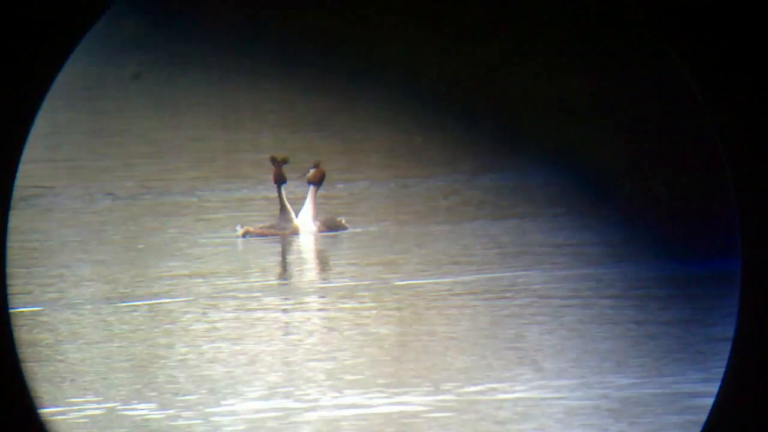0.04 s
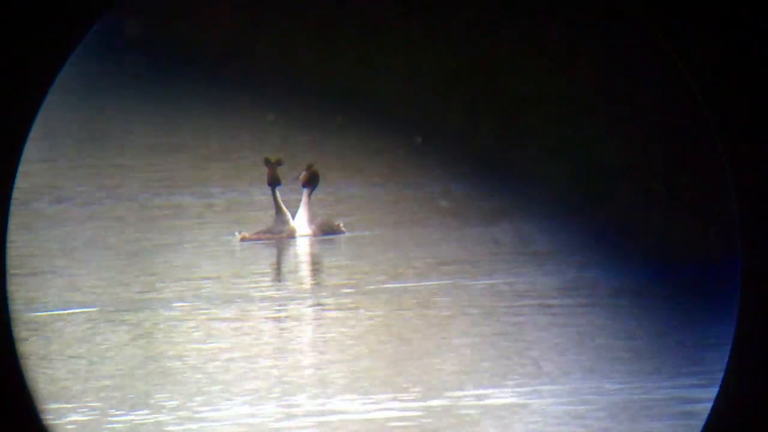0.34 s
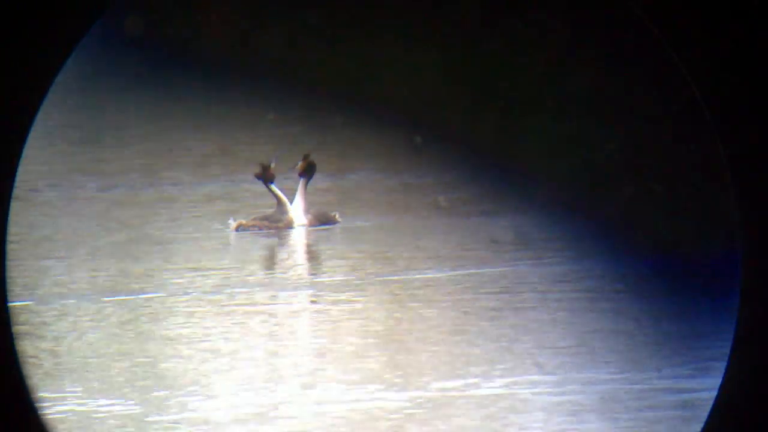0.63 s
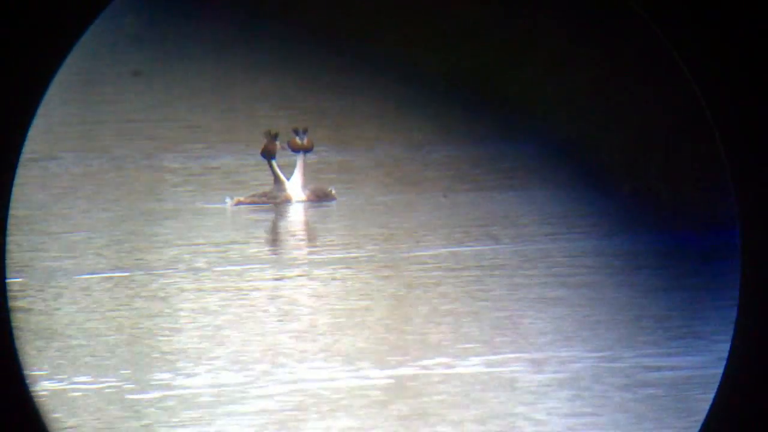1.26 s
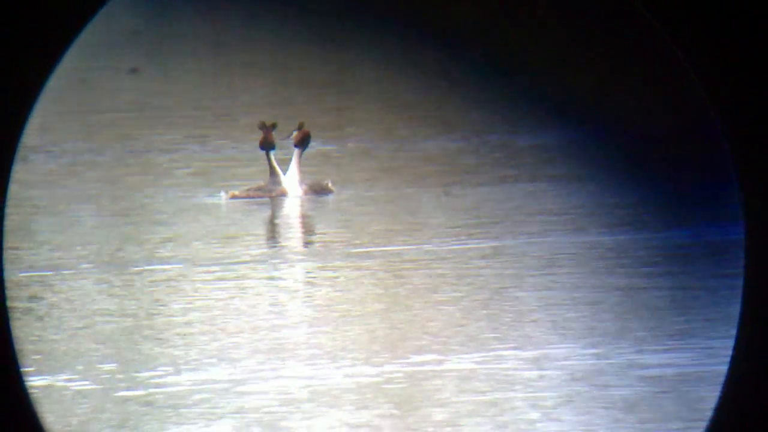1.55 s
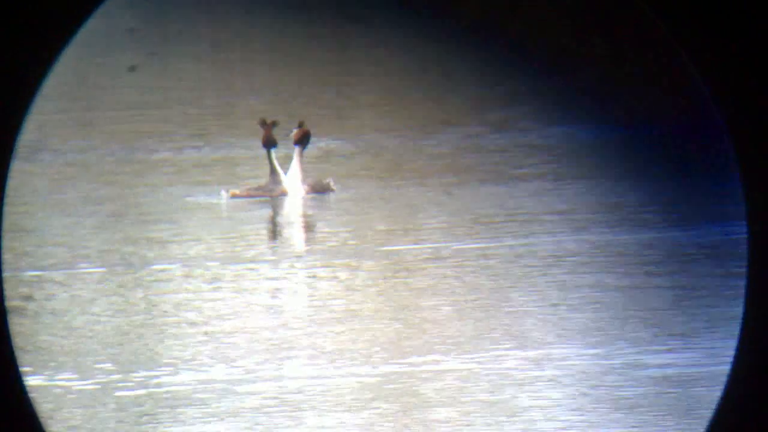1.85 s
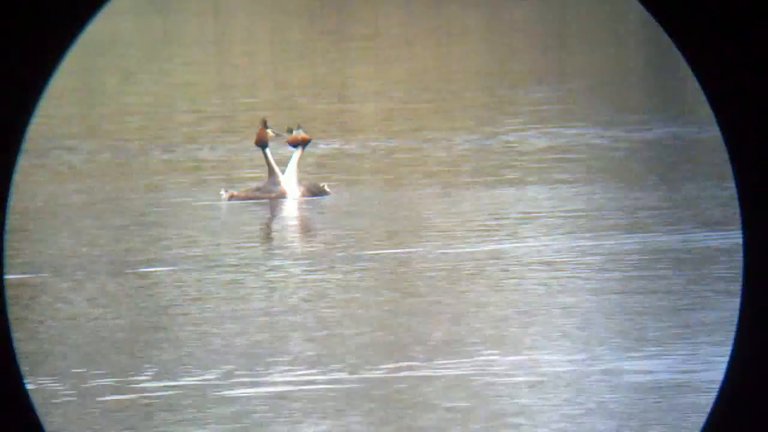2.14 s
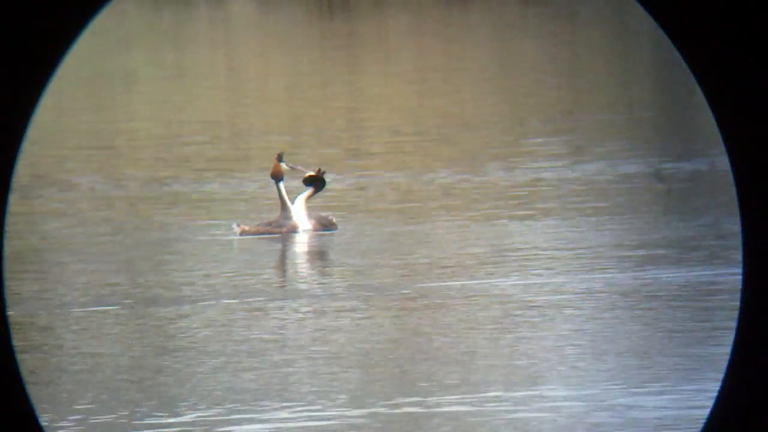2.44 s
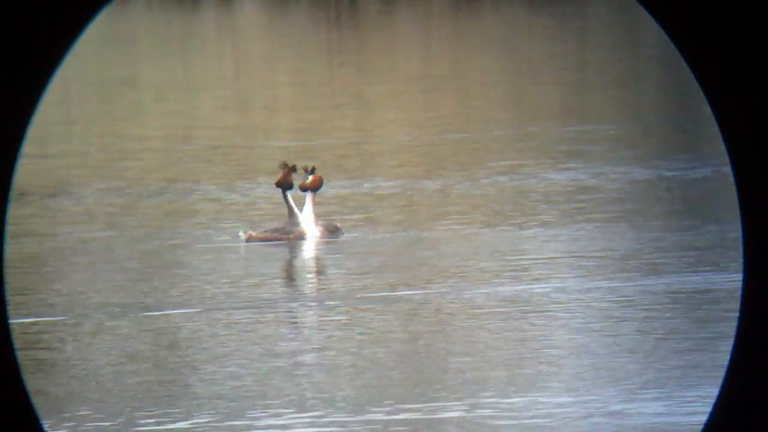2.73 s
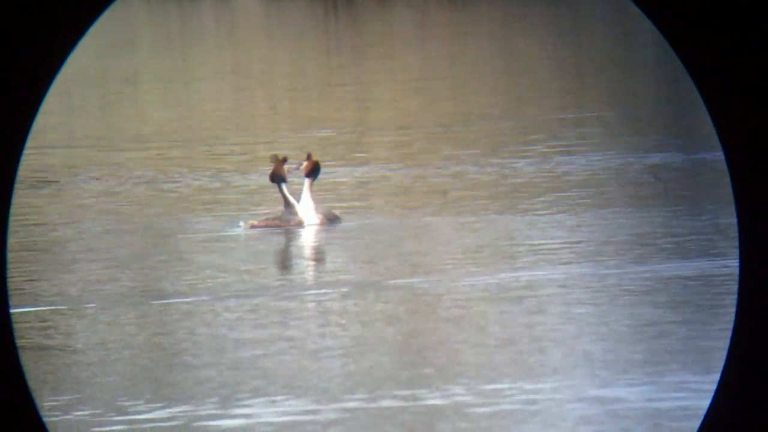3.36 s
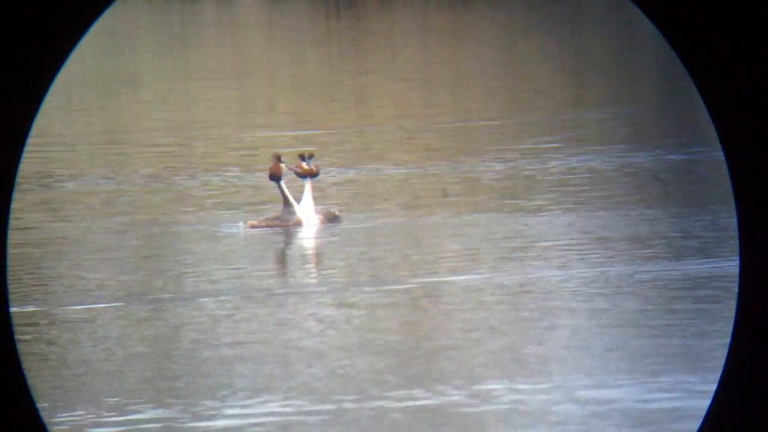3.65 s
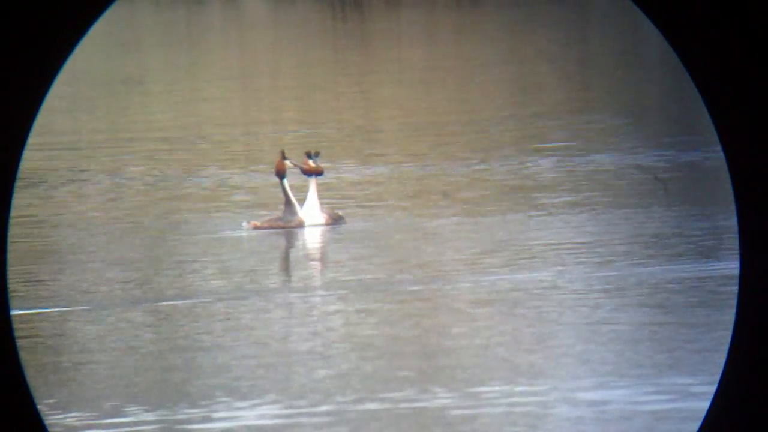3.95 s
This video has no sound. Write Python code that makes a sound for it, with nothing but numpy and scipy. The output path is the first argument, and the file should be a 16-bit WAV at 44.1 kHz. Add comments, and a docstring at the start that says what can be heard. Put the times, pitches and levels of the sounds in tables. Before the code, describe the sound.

Soft gusts of wind buffet the microphone, with light camera clicks and faint distant traffic.

```python
"""Gusts of light wind rumble on the microphone, and single eddies pop across its port.
This is a lakeside, heard from a small camera held against a spotting scope. The camera ticks on
the eyepiece, then slips with hard clicks, a scrape and a short stick-slip chatter.
Behind it hum the tyres of distant traffic, and far birds chirp faintly over a thin hiss."""
import sys
import numpy as np
from scipy import signal
from scipy.fft import rfft, irfft, next_fast_len
from scipy.io import wavfile
from scipy.ndimage import map_coordinates

SR = 44100
rng = np.random.default_rng(int(sys.argv[2]) if len(sys.argv) > 2 else 0)


def log_audio(samples):
    """Write samples as a 16-bit WAV file to the path given in sys.argv[1]."""
    # one column per channel
    frames = np.atleast_2d(samples).T
    # limit to full scale, then quantise
    limited = np.clip(frames, -1, 1)
    pcm = np.round(limited * 32767).astype(np.int16)
    wavfile.write(sys.argv[1], SR, pcm)


N = 176400
START_S = .093  # the camera's input opens

# gust envelope: t/s, level/dB
GUSTS = [(.1, -58), (.2, -54), (.24, -46), (.275, -58.5), (.325, -43), (.42, -56), (.75, -60.5),
         (.81, -54.5), (.86, -60.5), (1.055, -59.5), (1.09, -48.5), (1.15, -57), (1.26, -44), (1.37, -40),
         (1.455, -45), (1.5, -40.5), (1.6, -49), (1.69, -63), (1.9, -58.5), (2.11, -56.5), (2.19, -52),
         (2.33, -54.5), (2.43, -61), (2.62, -52), (2.8, -48), (2.855, -55.5), (2.9, -50), (3.1, -49.5),
         (3.15, -57.5), (3.19, -44.5), (3.26, -65.5), (3.37, -57.5), (3.445, -45), (3.49, -58),
         (3.6, -56.5), (3.67, -62), (3.88, -65.5), (4.0, -53.5)]
# colour of the gust rumble: f/Hz, relative level/dB
RUMBLE_COLOUR = [(15, -34), (28, -21.5), (45, -11.5), (70, -3.5), (110, -0.5), (170, -1), (250, -3),
                 (350, -10.5), (500, -21.5), (700, -25.5), (1200, -51.5), (3000, -98)]
# colour of the low bed under it: f/Hz, relative level/dB
BED_COLOUR = [(12, -17.5), (25, -8), (45, -2), (70, 2.5), (105, -1), (150, -0.5), (210, -13.5),
              (320, -31.5), (800, -56.5)]


def wind(flutter_db=2.83, flutter_per_s=65, bed_db=-54, bed_follow=0.36):
    """Turbulence on the microphone: a gusting rumble over a steadier low bed, fluttering together."""
    gust_db = curve(GUSTS)
    flutter = amp(flutter_db * wobble(flutter_per_s))
    rumble = amp(gust_db) * unit(noise(RUMBLE_COLOUR) * flutter)
    swing_db = gust_db - gust_db.mean()
    bed = amp(bed_db + bed_follow * swing_db) * unit(noise(BED_COLOUR) * flutter)
    return rumble + bed


# eddies popping across the port: t/s, peak level/dB, half width/s
EDDY_POPS = [(0.1207, -35.5, 0.001), (0.2343, -45, 0.0025), (.2524, -29, .0006), (.3214, -35, 0.0013),
             (.3679, -39, 0.00095), (0.4896, -38.5, 0.00041), (.819, -32, 0.00053),
             (1.3112, -34.5, 0.00049), (1.3592, -32.5, 0.00067), (1.3712, -30, 0.00063),
             (1.4854, -28, 0.00062), (1.4987, -32, 0.00049), (2.1881, -33.5, 0.00087),
             (2.1972, -35, 0.00071), (2.2619, -33.5, 0.00055), (2.3747, -37, 0.00071),
             (2.472, -41, 0.00057), (2.6265, -43, 0.00087), (2.736, -36, 0.0017), (2.7503, -41, 0.00049),
             (2.8073, -31.5, 0.001), (2.8173, -31, 0.00058), (2.8878, -37, 0.00051),
             (2.9122, -32.5, 0.00062), (2.9396, -40, 0.0019), (2.968, -38.5, 0.00036),
             (3.0138, -38, 0.00097), (3.1056, -36.5, 0.0007), (3.297, -37.5, 0.00087),
             (3.394, -44.5, .0007), (3.4517, -33.5, 0.00066), (3.4652, -40, 0.00082),
             (3.5209, -34, 0.00076), (3.5977, -33.5, 0.00068), (3.6191, -31, 0.00078),
             (3.699, -41, 0.00052), (3.7063, -34, 0.00095), (3.917, -42, .0008), (3.9333, -39, 0.00056),
             (3.9672, -32, 0.00075), (3.9891, -36, 0.00093)]


def eddies(small_per_s=16, small_width_s=0.00073, push_spread=3.5):
    """Each eddy is a brief suction in a wider push of equal area; small random ones ride the gusts."""
    out, t = np.zeros(N), np.arange(-SR // 50, SR // 50) / SR
    times = START_S + np.cumsum(rng.exponential(size=200)) / small_per_s
    strength, breadth = rng.standard_normal((len(times), 2)).T
    levels = np.interp(times, *np.transpose(GUSTS)) + 4.5 + 4 * strength  # about 4.5 dB over the gust
    widths = small_width_s * np.exp(0.19 * breadth)
    for s, db, width in list(EDDY_POPS) + list(zip(times, levels, widths)):
        push = bell(t + width, width * push_spread) / push_spread  # leads by one half width
        pop = push - bell(t, width)
        add(out, s + t[0], amp(db) * pop / np.abs(pop).max())
    return out


# light taps on the eyepiece: t/s, attack level/dB before trim
TICKS = [(.9395, -54), (1.1235, -52), (1.1405, -57.5), (1.170, -62), (1.291, -56), (1.407, -57),
         (1.4175, -52.5), (1.5825, -49.5), (1.598, -41), (1.6385, -56), (1.657, -51), (1.6662, -48.5),
         (1.6695, -57), (1.682, -51.5), (1.829, -58), (1.834, -59.5), (1.9215, -57.5), (1.926, -55.5),
         (1.9905, -61), (2.9055, -63), (2.948, -57), (3.0575, -59), (3.075, -60), (3.0895, -51.5)]
# housing tone under a tap: f/Hz, relative level/dB
TICK_BODY = [(300, -4.5), (1500, -9), (2200, -6), (2800, -6.5), (3300, -3), (3900, 0), (4400, -10),
             (5200, -21), (8000, -33), (15000, -40)]


def ticks(trim_db=2.5):
    """The camera taps lightly against the eyepiece."""
    return amp(trim_db) * contacts(TICKS, TICK_BODY, t60=0.0096, rattle=0.7)


# hard knocks of the slip: t/s, attack level/dB before trim
CLICKS = [(3.164, -39), (3.1763, -46.5), (3.2028, -40), (3.204, -41.5), (3.2106, -39.5), (3.2155, -51)]
# housing tone as it knocks and slides: f/Hz, relative level/dB
SLIP_BODY = [(300, -15), (1100, 0), (1800, -1), (2300, 5), (2750, -2.5), (3150, 1.5), (3900, -4),
             (4700, 2.5), (5700, -8), (7200, -18), (9500, -16.5), (11000, -23), (12500, -11.5),
             (15000, -39)]


def slip(trim_db=0.5):
    """The camera loses its seat: hard clicks with a soft scrape among them, then a fading chatter."""
    clicks = amp(trim_db) * contacts(CLICKS, SLIP_BODY, t60=0.01, rattle=1.28)
    scrape = slide(3.182, 3.202, db=-68, fade_db=2.5, grit=0.91)
    chatter = slide(3.216, 3.244, db=-56, fade_db=9.5, grit=0.56)
    return clicks + scrape + chatter


def contacts(hits, body, t60, rattle):
    """Small hard contacts: a sharp attack and milliseconds of rattle, coloured by the housing."""
    out, t = np.zeros(N), np.arange(SR // 20) / SR
    attack = ring((t == 0).astype(float), body)
    for s, db in hits:
        tail = ring(rng.standard_normal(len(t)) * amp(-60 * t / t60), body)
        crack = attack + rattle * tail * np.linalg.norm(attack) / np.linalg.norm(tail)
        add(out, s, amp(db) * crack / np.abs(attack).max())
    return out


def slide(start, end, db, fade_db, grit, slips_per_s=430):
    """The camera sticks and slips on the rim: a fast, uneven train of tiny contacts."""
    t = np.arange(N) / SR
    rate = slips_per_s * np.exp(0.13 * wobble(300))
    pulses = np.diff(np.floor(np.cumsum(rate) / SR), prepend=0)
    rub = unit(ring(unit(pulses) + grit * rng.standard_normal(N), SLIP_BODY))
    progress = np.clip((t - start) / (end - start), 0, 1)
    return rub * amp(db - fade_db * progress) * ((t > start) & (t < end))


# road envelope: t/s, level/dB before trim
ROAD_LEVEL = [(.1, -71), (.5, -70), (.85, -67), (1.0, -69), (1.17, -72.5), (1.35, -71.5), (2.0, -69),
              (2.25, -69.5), (2.63, -72), (3.0, -72.5), (3.3, -73.5), (3.55, -72.5), (3.8, -69.5),
              (4.0, -72)]
# colour of the tyre wash: f/Hz, relative level/dB
ROAD_COLOUR = [(60, 0), (300, -4), (500, -5.5), (760, -3), (910, 1), (1000, -1.5), (1130, -7), (1310, -2),
               (1550, -5.5), (1800, -14), (2200, -24.5), (4000, -36), (8000, -59)]
# colour of one vehicle's tyres: f/Hz, relative level/dB
VEHICLE_COLOUR = [(300, -8), (600, -10), (900, 5.5), (1150, -8), (1800, -30.5), (2500, -21), (3500, -49),
                  (8000, -47)]


def traffic(trim_db=5.5, waver_db=.5, swell_s=2.933, swell_half_width_s=.13, swell_db=-64.5):
    """Tyre noise of a distant road, gently wavering; one vehicle swells out of it."""
    road = amp(curve(ROAD_LEVEL) + trim_db + waver_db * wobble(8.4)) * noise(ROAD_COLOUR)
    swell = bell(np.arange(N) / SR - swell_s, swell_half_width_s)
    return road + amp(swell_db) * swell * noise(VEHICLE_COLOUR)


# far bird notes: t/s, length/s, start f/Hz, end f/Hz, peak level/dB
CHIRPS = [(2.155, .03, 3050, 2950, -80), (3.11, 0.038, 2080, 2000, -73), (3.618, 0.047, 3080, 2820, -77),
          (3.625, 0.049, 2020, 1920, -73.5), (3.864, 0.03, 3520, 3400, -78.5),
          (3.945, .03, 3700, 3500, -82)]


def birds(blur=.035):
    """Thin falling notes from across the water, blurred by a random pitch flutter."""
    out = np.zeros(N)
    for s, length, start_hz, end_hz, db in CHIRPS:
        glide = np.linspace(start_hz, end_hz, int(length * SR))
        hz = glide * (1 + blur * wobble(500)[:len(glide)])
        envelope = np.hanning(len(hz)) ** .5
        add(out, s, amp(db) * envelope * np.sin(2 * np.pi * np.cumsum(hz) / SR))
    return out


def amp(db):
    """Decibels to gain."""
    return 10 ** (np.asarray(db) / 20)


def unit(x):
    """Scale to rms 1."""
    return x / np.sqrt(np.mean(x ** 2) + 1e-20)


def bell(t, width):
    """A Gaussian hump of height 1 around t = 0."""
    return np.exp(-.5 * (t / width) ** 2)


def curve(rows):
    """An envelope through (t/s, value) points, one value per sample."""
    return np.interp(np.arange(N) / SR, *np.transpose(rows))


def wobble(rate):
    """A smooth random curve, rate knots a second."""
    return map_coordinates(rng.standard_normal(4096), [np.arange(N) * rate / SR], mode="wrap")


def eq_gain(colour, hz):
    """Gain at hz of an EQ curve drawn on a log frequency axis."""
    f, db = np.transpose(colour)
    return amp(np.interp(np.log(hz + 1), np.log(f + 1), db))


def filtered(x, response):
    """x through a zero-phase filter whose gain is response(hz)."""
    size = next_fast_len(N + 8192)
    return irfft(rfft(x, size) * response(np.fft.rfftfreq(size, 1 / SR)), size)[:N]


def noise(colour):
    """Coloured noise of rms 1."""
    return unit(filtered(rng.standard_normal(N), lambda hz: eq_gain(colour, hz)))


def ring(x, body, size=1024):
    """x through a causal filter with the colour of a body."""
    cepstrum = irfft(np.log(eq_gain(body, np.fft.rfftfreq(size, 1 / SR))))
    cepstrum[1:size // 2] *= 2  # fold to minimum phase: the attack stays sharp
    cepstrum[size // 2 + 1:] = 0
    impulse_response = irfft(np.exp(rfft(cepstrum)))
    return signal.fftconvolve(x, impulse_response)[:len(x)]


def add(out, s, x):
    """Mix x into out at s seconds."""
    part = out[round(s * SR):][:len(x)]
    part += x[:len(part)]


def scene():
    """Wind and handling up front, road and birds far back, in mono."""
    handling = ticks() + slip()
    return (wind() + eddies() + handling + traffic() + birds())[None]


# colour of the microphone hiss: f/Hz, relative level/dB
HISS_COLOUR = [(100, 8), (2500, 1.5), (5000, 0), (7000, -2.5), (10500, -3.5), (12300, -2), (15500, -3.5)]
HISS_DB, TOP_HZ = -76.5, 15750


def record(dry):
    """The camera adds hiss, opens its input a moment late and keeps nothing above its band limit."""
    live = np.arange(N) / SR > START_S
    hiss = amp(HISS_DB) * noise(HISS_COLOUR)
    return filtered((dry[0] + hiss) * live, lambda hz: hz < TOP_HZ)[None]


dry = scene()
out = record(dry)
log_audio(out)
```